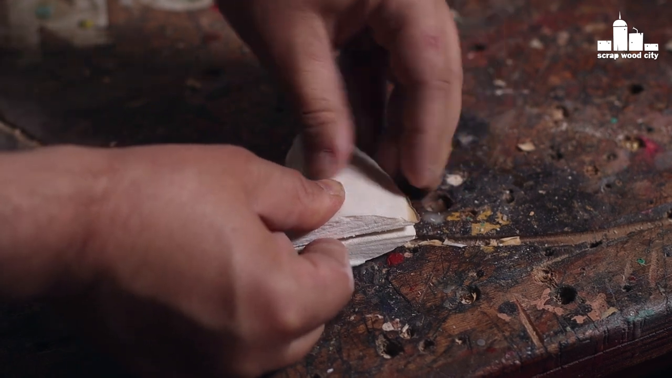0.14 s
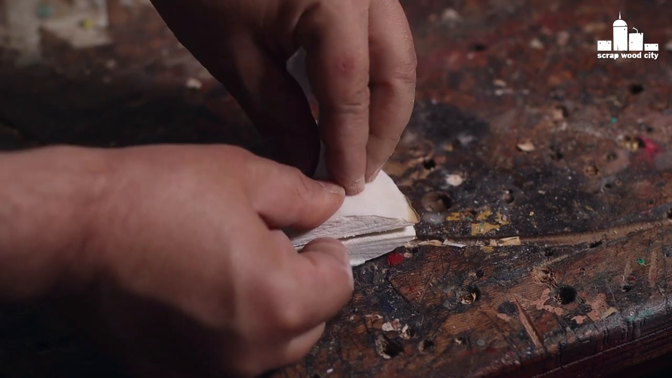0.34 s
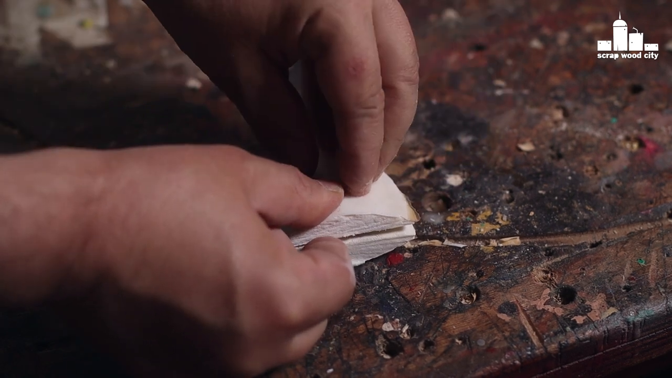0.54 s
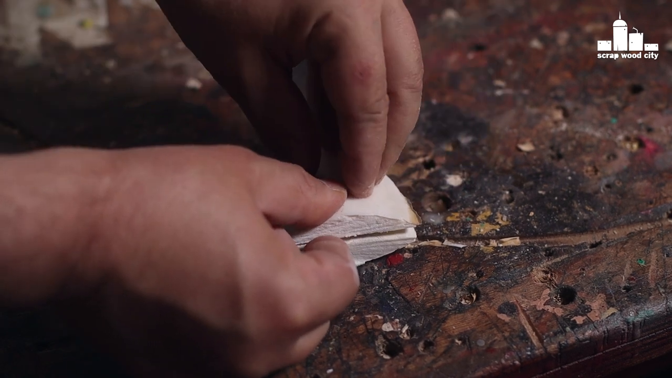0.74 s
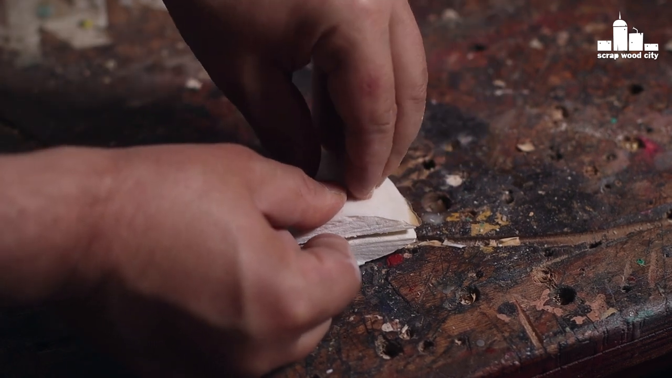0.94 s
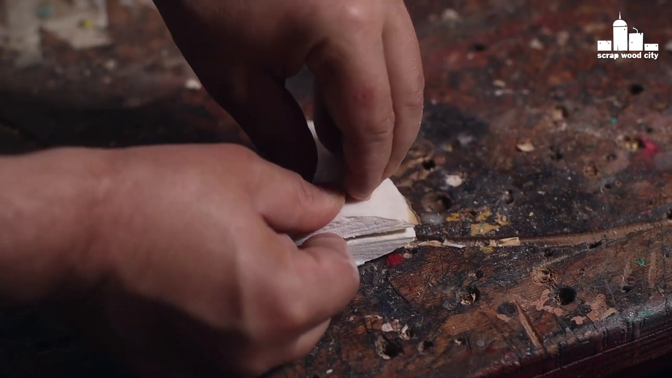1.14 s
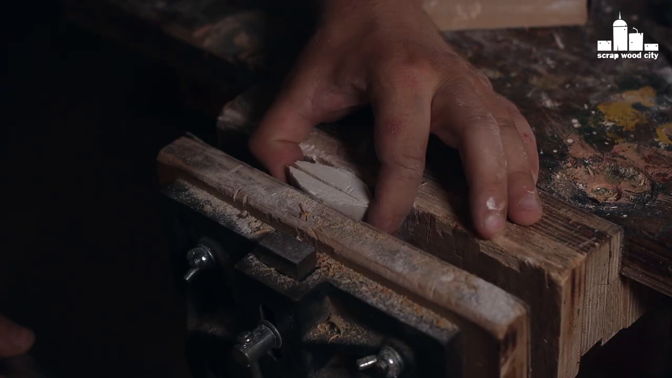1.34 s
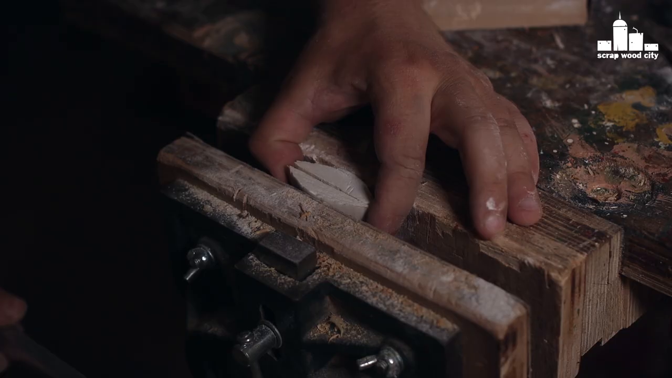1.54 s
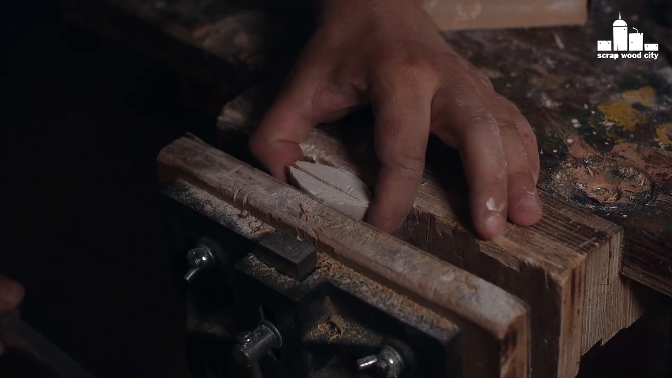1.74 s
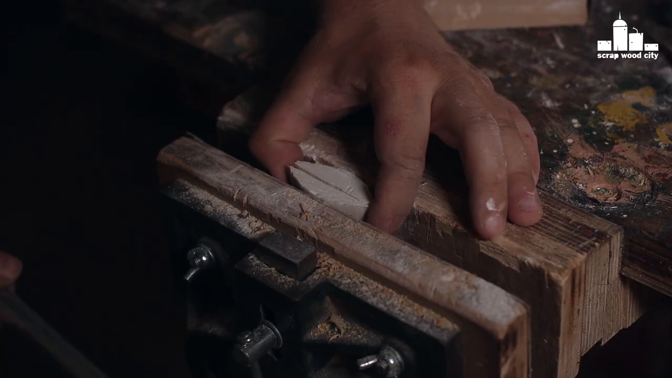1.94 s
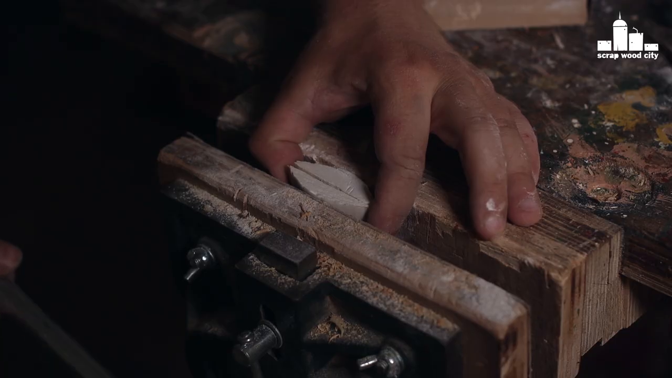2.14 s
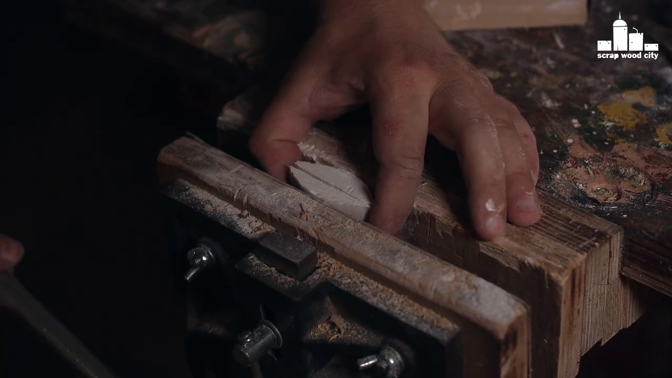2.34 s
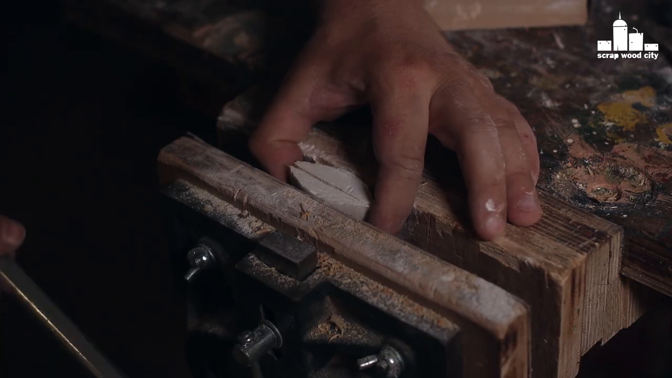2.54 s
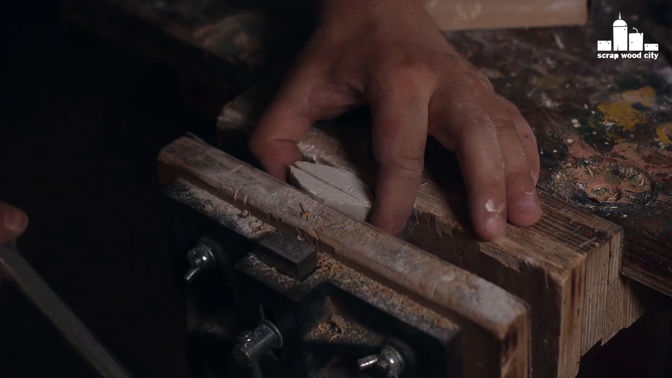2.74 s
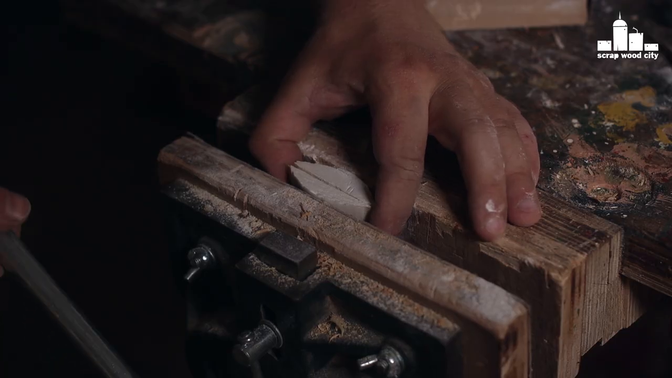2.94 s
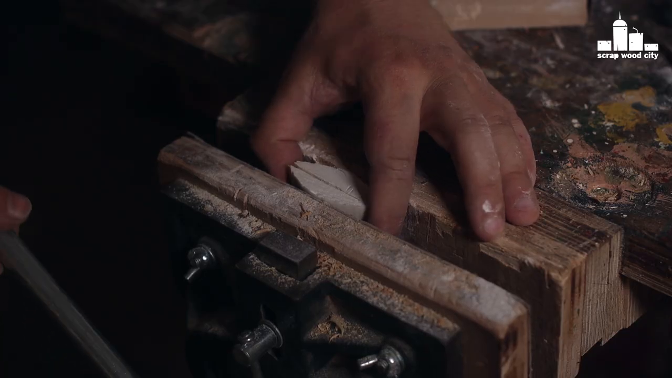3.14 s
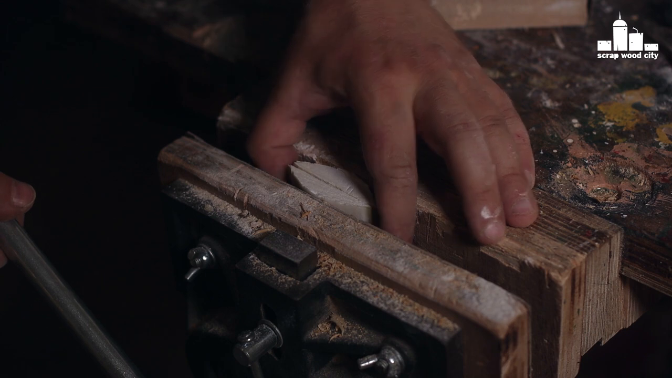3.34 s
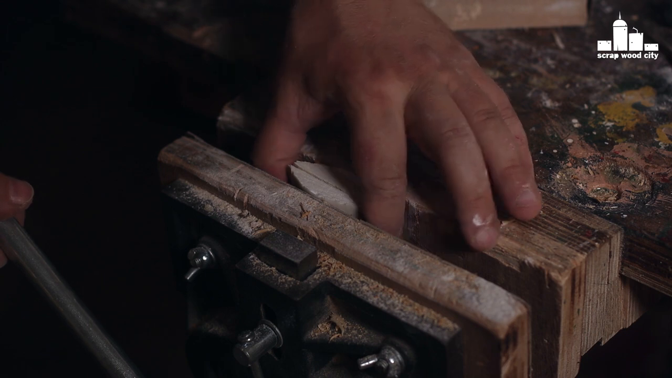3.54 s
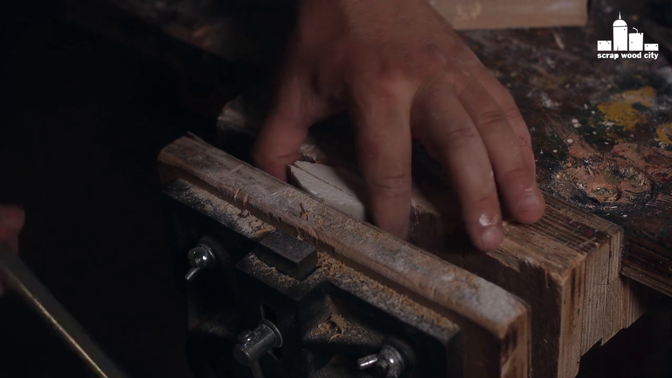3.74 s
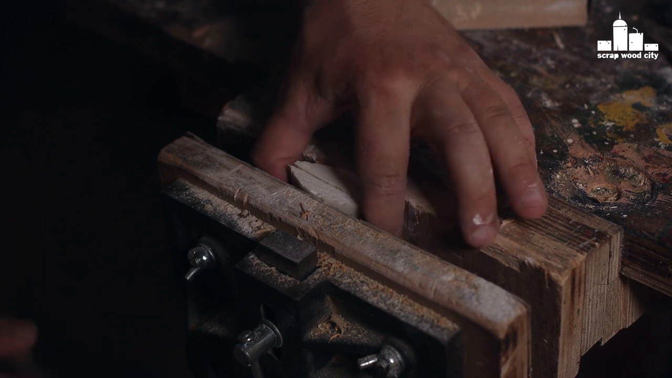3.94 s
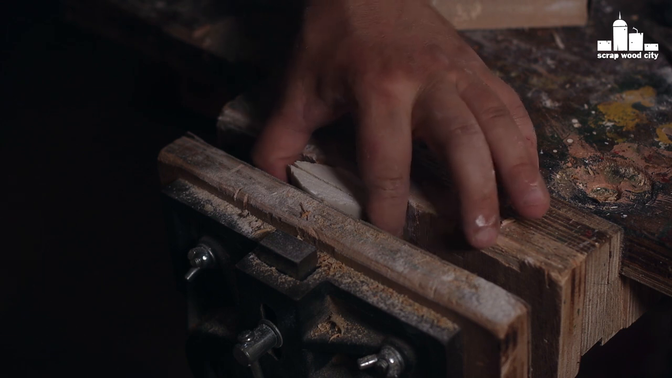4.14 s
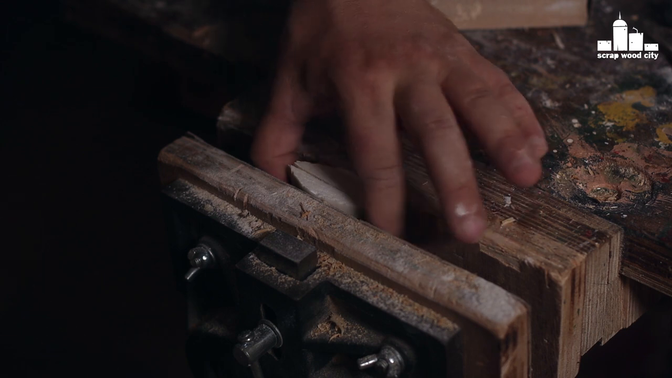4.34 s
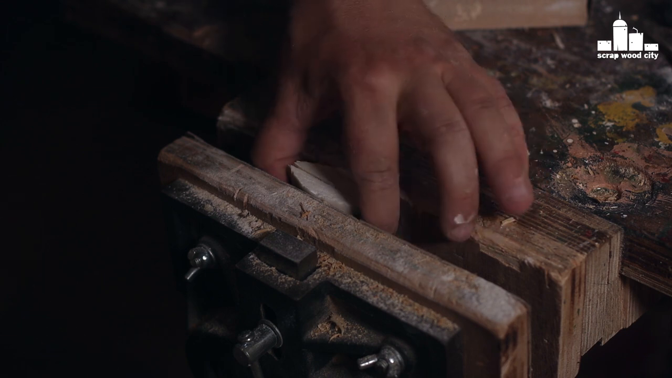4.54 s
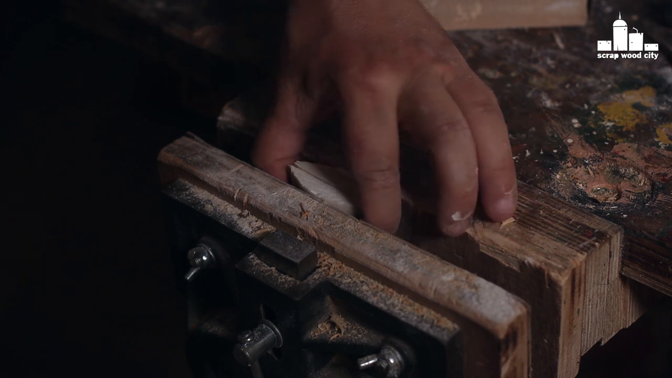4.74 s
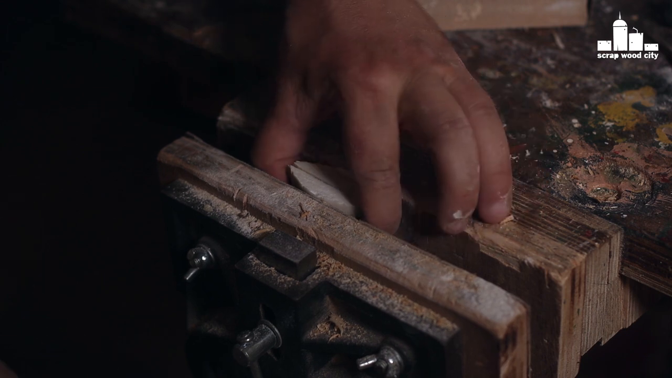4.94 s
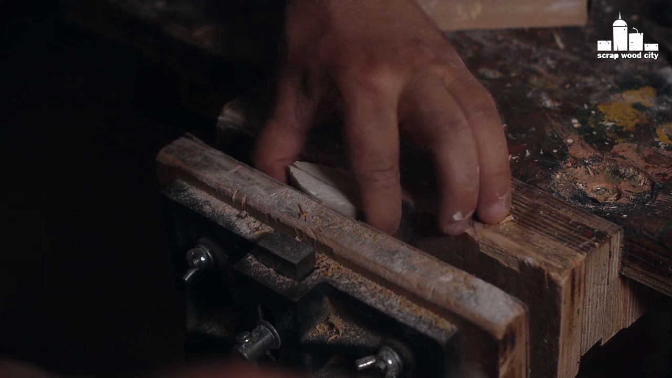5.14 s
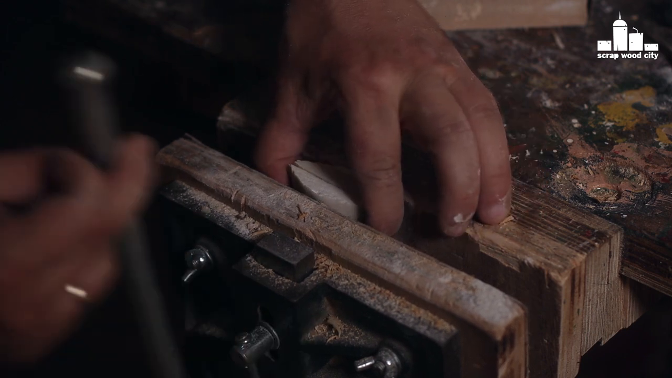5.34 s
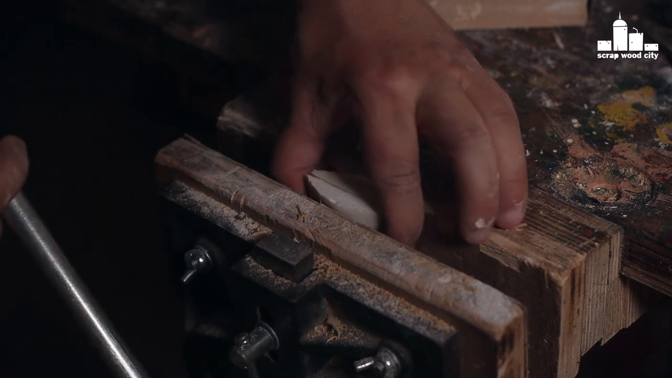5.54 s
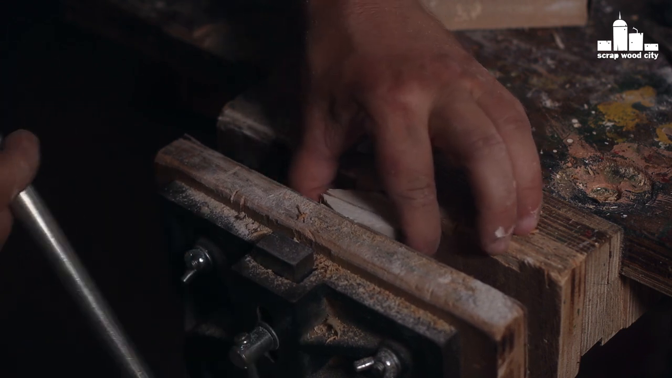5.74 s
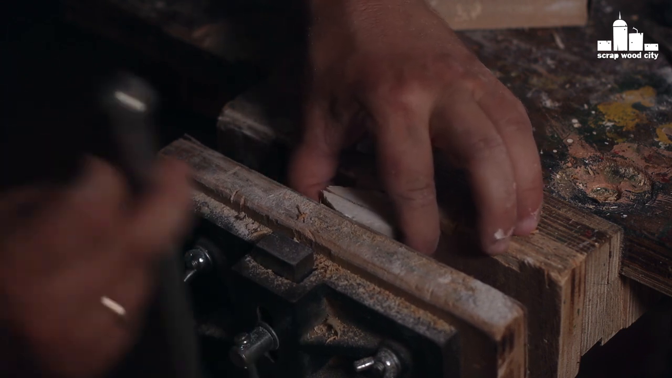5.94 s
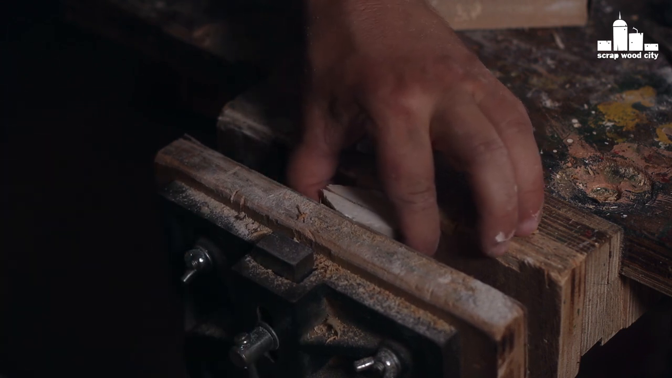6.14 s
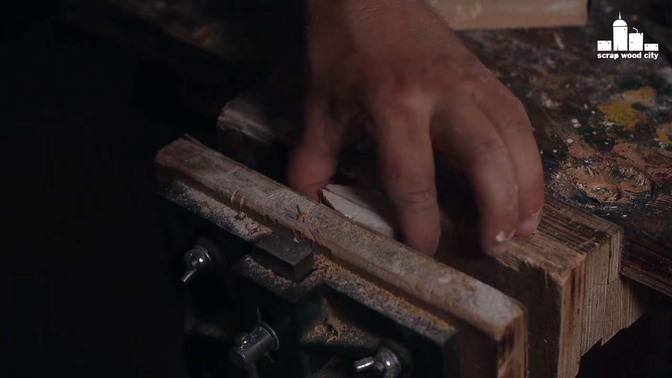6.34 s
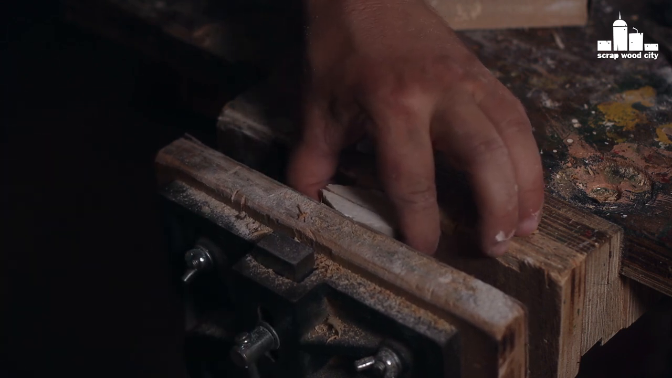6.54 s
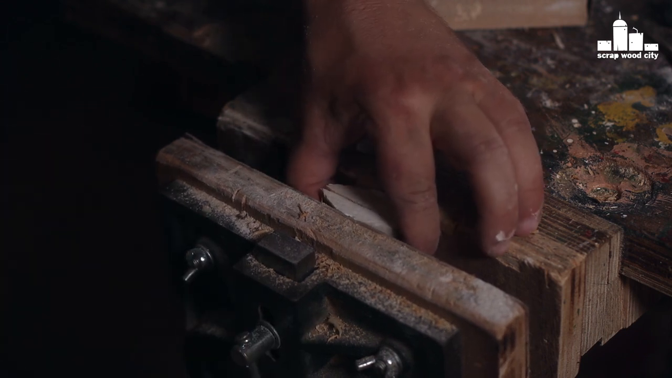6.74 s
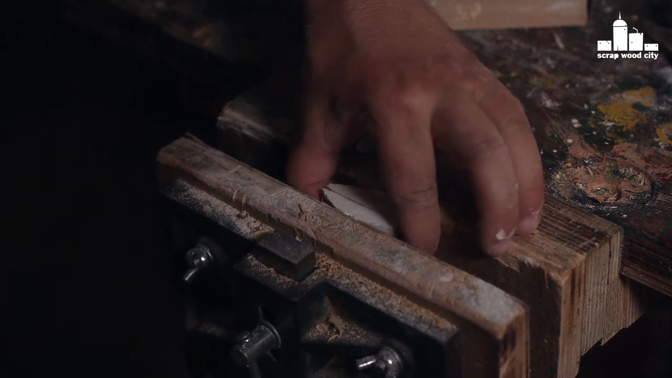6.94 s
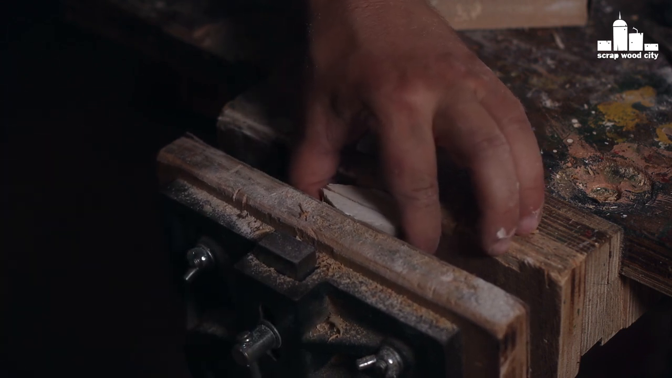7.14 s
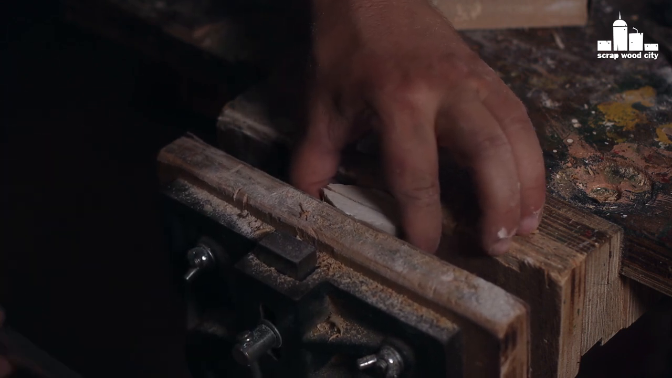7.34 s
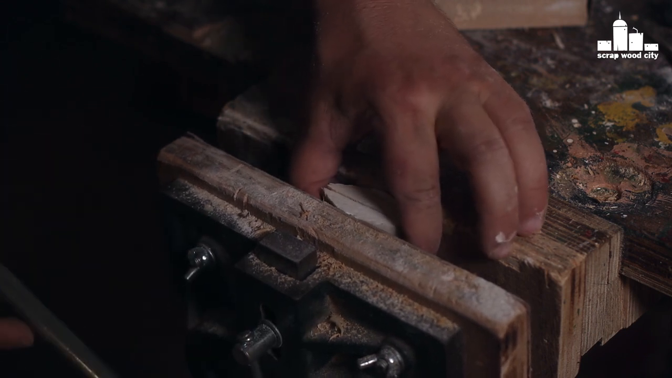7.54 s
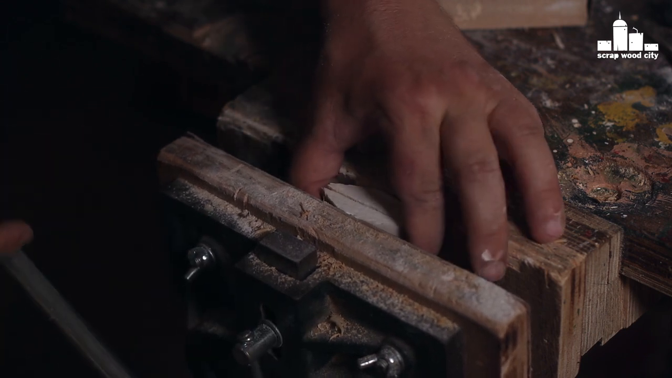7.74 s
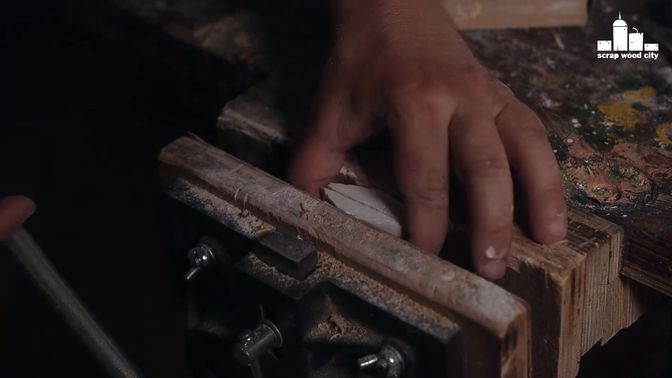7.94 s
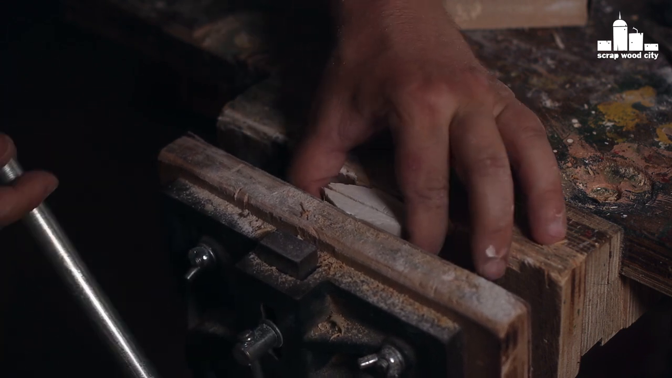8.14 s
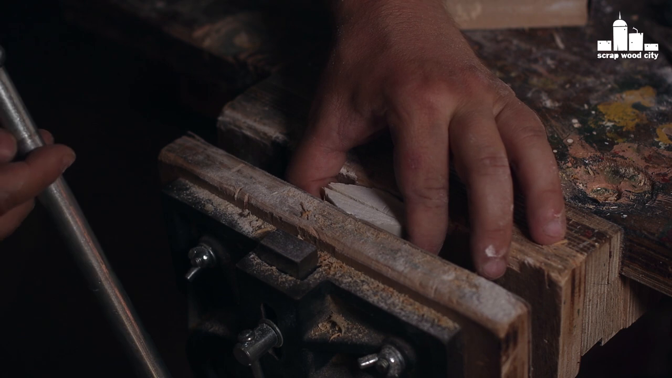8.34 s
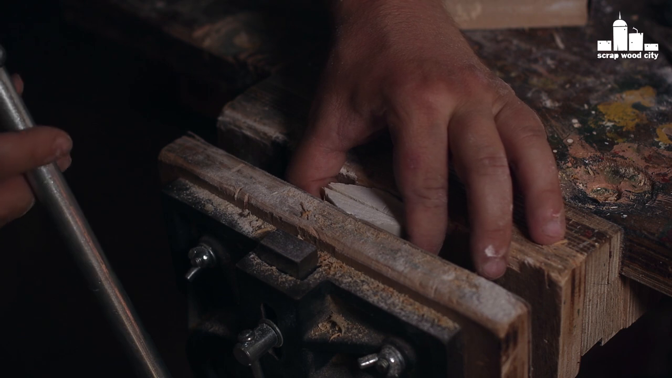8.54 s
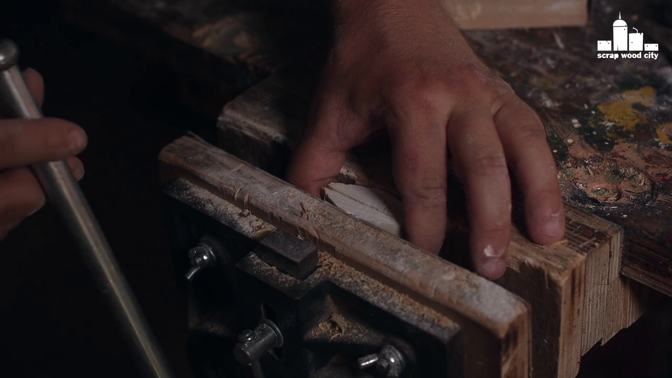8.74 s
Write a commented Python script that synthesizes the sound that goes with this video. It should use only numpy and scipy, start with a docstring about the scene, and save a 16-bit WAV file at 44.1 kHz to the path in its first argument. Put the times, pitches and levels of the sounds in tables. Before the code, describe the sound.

Close, dry skin rubbing and tiny snaps, then sparse metallic clacks and brief creaky scrapes as an iron vise is wound shut.

```python
"""A bench vise is wound shut on a small mould, close to a stereo microphone in a quiet workshop.
The screw grinds in short turns (scattered impulses through ringing iron and boards), and the loose handle bar
ticks, slides and clacks in its hub (short noise bursts through resonances). Before that, fingers press the
mould together: rubbing skin is noise made of tiny catches, snaps are bursts.
The room answers with echoes and a noise tail, over faint hiss, hum, rumble and drones made of noise and sines."""
import sys
import numpy as np
from scipy import signal
from scipy.fft import rfft, irfft, next_fast_len
from scipy.io import wavfile
from scipy.ndimage import map_coordinates

SR = 44100
rng = np.random.default_rng(int(sys.argv[2]) if len(sys.argv) > 2 else 0)


def attenuation_scalar(level_db):
    """Turn a level in dB into a linear amplitude multiplier (20 dB per decade)."""
    decades = np.asarray(level_db, float) / 20
    return 10 ** decades


def materialize(psi):
    """Save the field psi as 16-bit PCM at rate SR to the path in sys.argv[1].

    A 1-D psi becomes a single channel; in a 2-D psi each row is a channel.
    """
    bounded = np.clip(np.atleast_2d(psi).T, -1, 1)
    quanta = np.round(bounded * 32767).astype(np.int16)
    wavfile.write(sys.argv[1], SR, quanta)


N = 387198  # length in samples


def unit(x):
    """Scale x to an rms of 1."""
    return x / np.sqrt(np.mean(x ** 2) + 1e-20)


def noise():
    """White noise as long as the scene."""
    return rng.standard_normal(N)


def along(points, hz):
    """Read (f/Hz, value) points at any frequency, on a log axis."""
    f, value = np.transpose(points)
    return np.interp(np.log(hz + 1), np.log(f + 1), value)


def gain(rows):
    """One gain per sample from (t/s, level/dB) rows, practically silent outside them."""
    s, db = np.transpose(rows)
    return attenuation_scalar(np.interp(np.arange(N) / SR, s, db, left=-200, right=-200))


def swell(start, peak, end, db, rise_db, fall_db):
    """A gain that climbs rise_db to its peak, then sinks fall_db; silent outside."""
    return gain([(start, db - rise_db), (peak, db), (end, db - fall_db)])


def swells(rows, rise_db, fall_db):
    """All the swells of a table, added up."""
    return sum(swell(*row, rise_db, fall_db) for row in rows)


def wobble(rate):
    """A smooth random curve through `rate` random knots a second."""
    knots = rng.standard_normal(int(N * rate / SR) + 4)
    return map_coordinates(knots, [np.arange(N) * rate / SR])


def filtered(x, response):
    """Multiply the spectrum of x by a complex response of frequency."""
    n = x.shape[-1]
    m = next_fast_len(n + 8192)  # room for the ringing
    return irfft(rfft(x, m) * response(np.fft.rfftfreq(m, 1 / SR)), m)[..., :n]


def band(f, hz, width_hz):
    """One resonance that rings only after it is struck."""
    return 1j * f * width_hz / (hz * hz - f * f + 1j * f * width_hz + 1e-9)


def modes(f, table):
    """The resonances of a body, each excited at a slightly random strength, with alternating signs."""
    total = 0
    for k, (hz, width_hz, db) in enumerate(table):
        strength = attenuation_scalar(db + rng.normal(0, 2))
        total = total + (-1) ** k * strength * band(f, hz, width_hz)
    return total


def spread(pair, alike, spectrum=((1, 0),)):
    """Mix two unrelated noises into a left and right of the given likeness, and colour them."""
    def mid_side_gains(hz):
        angle = np.arccos(np.clip(along(alike, hz), -1, 1)) / 2
        return attenuation_scalar(along(spectrum, hz)) * [np.cos(angle), np.sin(angle)]
    mid, side = filtered(pair, mid_side_gains)
    return np.array([mid + side, mid - side])


def burst(t60, length=0.2, spray=1.0):
    """A first touch, then a spray of smaller ones that swells for a moment and dies; times in s."""
    t = np.arange(round(length * SR)) / SR
    x = rng.standard_normal(len(t)) * (1 - np.exp(-t / 0.0033)) * attenuation_scalar(-60 * t / t60)
    x *= spray / np.linalg.norm(x)
    x[0] += 1
    return x


def grit(rate, spread_db):
    """Irregular catches of a rough surface: about `rate` impulses a second, of scattered size, rms 1."""
    hits = rng.random(N) < rate / SR
    size = rng.standard_normal(N) * attenuation_scalar(spread_db * rng.exponential(size=N))
    return unit(hits * size)


def add(track, s, x):
    """Mix x into the track at time s."""
    part = track[round(s * SR):][:len(x)]
    part += x[:len(part)]


# colour of the room tone: f/Hz, level/dB (relative, per Hz)
AIR_COLOUR = [(15, -59), (25, -24), (58, -7), (90, -7), (154, -8), (214, -6), (399, -12.5), (433, -15.5),
              (496, -11.5), (538, -11.5), (669, -17), (1090, -17.5), (2150, -21.5), (14800, -27.5),
              (16500, -27)]
# how alike left and right are in the room tone: f/Hz, likeness (1 same, 0 unrelated, below 0 opposed)
AIR_LIKENESS = [(60, 0.89), (180, 0.85), (550, 0.53), (1650, -0.049), (4970, -0.17), (15000, -0.35)]
# steady low tones: f/Hz, level/dB (rms, before the wobble)
DRONES = [(86.1, -83.5), (102.3, -79.5)]
# swells of the low rumble: start t/s, peak t/s, end t/s, level/dB
RUMBLE_SWELLS = [(.9, 1.3, 1.56, -69.5), (3.7, 3.82, 4.0, -66), (4.85, 5.07, 5.3, -61),
                 (6.3, 6.5, 6.88, -65)]
# comings and goings of the faint hum: start t/s, peak t/s, end t/s, level/dB
HUM_SWELLS = [(0, 1.2, 5.4, -75.5), (8.1, 8.4, 9.1, -74.5)]


def air():
    """Room tone and hiss are coloured noise, rumble and hum narrow noise bands, drones wavering sines."""
    level = attenuation_scalar(-64.5 + 0.77 * wobble(2.35))
    tone = level * unit(spread(rng.standard_normal((2, N)), AIR_LIKENESS, AIR_COLOUR))
    rumble = unit(filtered(noise(), lambda f: band(f, 69.5, 25) ** 2))
    hum = unit(filtered(noise(), lambda f: band(f, 429, 32) ** 2))
    t = np.arange(N) / SR
    drone = 0
    for hz, db in DRONES:
        drone = drone + attenuation_scalar(db + 4.4 * wobble(1.9)) * np.sqrt(2) * np.sin(2 * np.pi * hz * t)
    low = swells(RUMBLE_SWELLS, rise_db=8, fall_db=15) * rumble
    return tone + drone + low + swells(HUM_SWELLS, rise_db=5.5, fall_db=13.5) * hum


# early echoes: delay t/s, level/dB, left over right level/dB
WALL_ECHOES = [(.0045, -3.5, -2), (0.0127, -11.5, 5.5)]
# how fast the late tail dies: f/Hz, time to fall 60 dB t/s
TAIL_DECAY = [(200, 0.61), (1000, 0.56), (4000, 0.5), (8000, 0.42), (14000, 0.27)]
# how alike left and right are in the tail: f/Hz, likeness (1 same, 0 unrelated)
TAIL_LIKENESS = [(200, 1), (1000, 0.97), (4000, 0.78), (12000, 0.067)]


def room(x, wet_db, step=.3):
    """Early echoes, then a noise tail whose frequencies die at their own speeds, new every `step` seconds."""
    out = np.array([x, x])
    for delay, db, pan_db in WALL_ECHOES:
        echo = np.pad(x, (round(delay * SR), 0))[:N]
        out += attenuation_scalar([[db + pan_db / 2], [db - pan_db / 2]]) * echo
    size = round(step * SR)
    for start in range(0, N, size):
        hz, t, z = signal.stft(rng.standard_normal((2, round(.7 * SR))), SR, nperseg=256)
        dying = z * attenuation_scalar(-60 * t / along(TAIL_DECAY, hz)[:, None])
        tail = spread(signal.istft(dying, SR, nperseg=256)[1], TAIL_LIKENESS)
        t_tail = np.arange(tail.shape[1]) / SR
        tail *= np.clip(t_tail / 0.0027, 0, 1)  # the tail builds up after the direct sound
        tail *= 1 + 1.84 * attenuation_scalar(-60 * t_tail / .12)  # near surfaces answer first and strongly
        tail /= np.linalg.norm(tail[0])
        wet = signal.fftconvolve(x[None, start:start + size], tail, axes=1)
        out[:, start:start + wet.shape[1]] += attenuation_scalar(wet_db) * wet[:, :N - start]
    return out


# pressure of the fingers: t/s, level/dB (of the rub, before its strokes)
FINGER_PRESSURE = [(0, -64), (.1, -58), (.28, -55.5), (.4, -63), (.8, -64.5), (1.05, -63.5), (1.2, -64.5),
                   (1.41, -64)]
# colour of skin on the mould: f/Hz, level/dB (relative, per Hz)
SKIN_COLOUR = [(410, -3.5), (700, -4), (1010, -3.5), (1830, -3), (2600, -2.5), (3830, -3), (5560, -11.5),
               (9000, -25.5), (11700, -18), (19800, -120)]
# two resonances of the scrape: f/Hz, width f/Hz, level/dB (over the rub, before it drifts)
SCRAPE = [(2470, 420, -14.5), (2970, 450, -14)]


def rubbing():
    """Skin catches on the mould right by the microphone, in uneven strokes, with a drifting scrape in it."""
    pair = np.array([grit(rate=5600, spread_db=-1.0), grit(rate=5000, spread_db=3.0)])
    strokes = attenuation_scalar(1.4 * wobble(19.9) + 0.42 * wobble(5.5))
    rub = unit(spread(pair, [(1000, 0.99), (6000, 0.62)], SKIN_COLOUR))
    scrape = 0
    for hz, width_hz, db in SCRAPE:
        ringing = unit(filtered(rub, lambda f: band(f, hz, width_hz) ** 2))
        scrape = scrape + attenuation_scalar(db + 6.1 * wobble(5.33)) * ringing
    return gain(FINGER_PRESSURE) * strokes * (rub + scrape)


# palm sliding along the bar: start t/s, peak t/s, end t/s, level/dB
PALM_SLIDES = [(5.5, 5.68, 5.87, -57)]
# colour of the sliding palm: f/Hz, level/dB (relative, per Hz)
PALM_COLOUR = [(1760, -2), (3000, -1), (6620, -5.5), (12100, 4), (15100, 1), (16000, 9.5)]
# palm dragging on the bar: start t/s, peak t/s, end t/s, level/dB
PALM_DRAGS = [(5.2, 5.55, 5.78, -71.5), (7.62, 7.7, 7.95, -72.5)]
# the handle bar humming under the palm: f/Hz, width f/Hz, level/dB (relative)
BAR_MODES = [(1050, 72, -13), (1570, 146, -17), (520, 100, -18)]
# snaps and taps of fingers on mould and bar, and one ringing ping of the vise (at 5.792 s):
# t/s, peak level/dB, f/Hz, width f/Hz, time to fall 60 dB t/s
SNAPS_AND_PING = [(.07, -30, 9700, 5960, 0.0035), (0.07, -36.5, 4000, 5000, .015),
                  (0.188, -34.5, 7300, 2000, 0.0058), (0.192, -28.5, 11100, 8200, 0.0064),
                  (0.191, -39, 2360, 5000, .03), (.27, -67, 4000, 8000, .05), (.274, -54, 520, 121, 0.037),
                  (0.581, -49.5, 9000, 9000, 0.053), (0.61, -42, 560, 1080, 0.031),
                  (.635, -47.5, 9000, 9000, .017), (.835, -49, 4270, 1300, 0.16),
                  (2.884, -52, 4500, 6100, .18), (3.149, -62, 2000, 2000, .02),
                  (3.443, -41, 2870, 9500, 0.078), (3.543, -45.5, 4520, 9350, 0.01),
                  (4.481, -59, 12000, 5050, 0.013), (5.792, -54.5, 5170, 500, 0.047),
                  (7.595, -41.5, 3600, 9000, 0.0051)]


def hands_and_ping():
    """Bursts for mould snaps, finger taps and one ping of the vise; noise for a palm that makes the bar hum."""
    slide = unit(filtered(noise(), lambda f: attenuation_scalar(along(PALM_COLOUR, f))))
    bar_hum = unit(filtered(noise(), lambda f: modes(f, BAR_MODES) + 0.093 * band(f, 840, 1300)))
    out = swells(PALM_SLIDES, rise_db=16, fall_db=19.5) * slide
    out += swells(PALM_DRAGS, rise_db=2.5, fall_db=9) * bar_hum
    for s, db, hz, width_hz, t60 in SNAPS_AND_PING:
        hit = filtered(burst(t60), lambda f: band(f, hz, width_hz) ** 2)
        add(out, s, attenuation_scalar(db) * hit / abs(hit).max())
    return out


# modes of the bench boards: f/Hz, width f/Hz, level/dB (relative)
BENCH_MODES = [(160, 23, -9), (234, 15, 3), (342, 15.2, -1.5), (384, 25, -6.5), (529.5, 50, -0.5),
               (680, 113, -12.5), (718, 27, -7.5)]


def bench(f):
    """The bench boards ring at a handful of low resonances."""
    return modes(f, BENCH_MODES)


# rings of the iron casting: f/Hz, width f/Hz, level/dB (relative)
IRON_RINGS = [(980, 30, -1), (1060, 58, 5), (1520, 310, 3), (2140, 52, -7), (2290, 76, 2.5),
              (2560, 200, -3.5), (3663, 46, 10.5), (3780, 120, -15), (4380, 440, -10), (5430, 320, 2.5),
              (7960, 88, 2.5), (10700, 90, 6), (12500, 29, 19)]


def iron(f, ring_db=-8):
    """The casting adds its rings, at slightly random strengths, on top of a broad contact sound."""
    rings = 0
    for hz, width_hz, db in IRON_RINGS:
        rings = rings + attenuation_scalar(ring_db + db + 2 * rng.standard_normal()) * band(f, hz, width_hz)
    return 1 + rings


# contacts in the vise: t/s, tone peak level/dB, tone f/Hz, then against the tone's peak:
# bench thud level/dB, bright edge level/dB
CONTACTS = [(1.532, -41, 1740, -28, 3.5), (2.488, -36, 1740, -23, 4), (3.694, -60.5, 696, 7, -28),
            (3.721, -43.5, 1670, -3.5, -46), (3.755, -28.5, 1970, -9.5, -1.5),
            (3.766, -34.5, 646, -12.5, -40), (3.806, -34.5, 1780, -14, -37), (3.835, -47.5, 690, 6, -31),
            (3.868, -43.5, 1460, -3, -27), (4.038, -13.5, 2280, -26, -7.5), (4.044, -25.5, 787, -15.5, 2.5),
            (4.254, -52, 960, -6, 0), (4.79, -47.5, 1030, 0.5, -6), (4.82, -33.5, 1030, -5, -9),
            (4.876, -29, 1530, -6, -5), (4.895, -35, 1500, -21, -6), (4.915, -27, 1110, -11.5, -1.5),
            (4.946, -25, 1320, -4.5, -4), (4.983, -22.5, 2800, -15.5, -31), (5.011, -26.5, 790, -14, -2.5),
            (5.049, -25.5, 1390, -12.5, -6.5), (5.114, -48, 777, -5, -29), (5.735, -47, 1550, 0, -21),
            (5.79, -39, 1860, -7, -9), (5.826, -30.5, 1330, -5.5, -19), (5.902, -15.5, 3090, -20, -15),
            (5.91, -23.5, 2350, -30, -10), (5.926, -29, 930, -18, -2), (6.313, -26.5, 1570, -10.5, -14),
            (6.328, -34.5, 680, -3.5, -43), (6.465, -36.5, 1550, 1, 8.5), (6.473, -37, 1020, -22, -5),
            (6.52, -49.5, 1050, 8.5, -17), (8.03, -54.5, 1390, -20, 1.5)]


def clacks():
    """Each contact has a tone of its own, a thud in the bench, a wooden knock and a bright edge."""
    out = np.zeros(N)
    for s, db, hz, thud_db, edge_db in CONTACTS:
        hard = min(attenuation_scalar(edge_db), 1)  # a hard contact is brief, so its tone spreads wider
        width_hz = (0.59 + 1.66 * hard) * hz
        tone = filtered(burst(0.03, spray=0.72), lambda f: band(f, hz, width_hz) ** 3 * iron(f))
        thud = filtered(burst(0.055), lambda f: bench(f) * band(f, 165, 720) ** 2)
        knock = filtered(burst(0.018), lambda f: band(f, 860, 1280) ** 3 * (iron(f) + 1.06 * bench(f)))
        edge = filtered(burst(0.0045, spray=0.4),
                        lambda f: (band(f, 4050, 1947) ** 2 + 0.28 * band(f, 5700, 5000) ** 2) * iron(f))
        knock_db = thud_db / 2 + 0.5  # the jaws knock harder when more of the blow goes into the wood
        for part, part_db in ((tone, 0), (thud, thud_db), (knock, knock_db), (edge, edge_db)):
            add(out, s, attenuation_scalar(db + part_db) * part / abs(part).max())
    dull_hz = 8100  # heavy parts put little sound above this
    return filtered(out, lambda f: 1 / (1 + 1.3j * f / dull_hz - (f / dull_hz) ** 2))


# pulls on the handle that load the screw: start t/s, peak t/s, end t/s,
# load level/dB (before the uneven drag), rasp against the load level/dB
TURNS = [(3.716, 3.79, 4.44, -67.5, -10), (4.786, 4.809, 4.94, -50, -20), (4.878, 4.934, 4.99, -45, 3),
         (4.97, 5.01, 5.136, -48.5, 1.5), (5.76, 5.869, 6.01, -49, -30), (6.165, 6.274, 6.31, -66, -11),
         (6.315, 6.391, 6.46, -56, -25), (6.48, 6.54, 6.77, -64, -9.5)]
# colour of the rasp: f/Hz, level/dB (relative)
RASP_COLOUR = [(1290, -53), (2200, -2.5), (3620, -5), (6990, -17), (10000, -17), (12300, -36), (15000, -45)]


def screw():
    """The loaded thread catches and slips: coarse slips shake the bench and groan, fine grit rasps in the iron."""
    out = np.zeros(N)
    ends_db, rasp_grows, groan_db = 11, 2.6, 1  # load's drop at both ends; rasp drops more; groan over rumble
    for start, peak, end, db, rasp_db in TURNS:
        load = swell(start, peak, end, db, ends_db, ends_db)
        rasp = swell(start, peak, end, db + rasp_db, rasp_grows * ends_db, rasp_grows * ends_db)
        slips = grit(rate=500, spread_db=2)
        fine = grit(rate=2500, spread_db=2)
        rumble = unit(filtered(slips, lambda f: bench(f) * band(f, 307, 385) ** 2))
        groan = unit(filtered(slips, lambda f: band(f, 780, 670) ** 2 * (iron(f, ring_db=-7) + 4.0 * bench(f))))
        hiss = unit(filtered(fine, lambda f: attenuation_scalar(along(RASP_COLOUR, f)) * iron(f, ring_db=15.0)))
        drag = attenuation_scalar(2.5 * wobble(35))  # the drag is uneven along the thread
        out += drag * (load * (rumble + attenuation_scalar(groan_db) * groan) + rasp * hiss)
    return out


def scene():
    """Vise and hands in the room, a touch stronger on the right, with the close rubbing and the room tone."""
    in_room = room(clacks() + screw() + hands_and_ping(), wet_db=4.5)
    return attenuation_scalar([[-.2], [.2]]) * in_room + rubbing() + air()


def low_pass(x):
    """Removes everything above the highest recorded frequency."""
    return signal.sosfilt(signal.butter(12, 16670, fs=SR, output="sos"), x)


def record(dry):
    """The mix keeps only what lies below 15780 Hz."""
    mix = filtered(dry, lambda hz: hz < 15780)
    return low_pass(mix)


dry = scene()
out = record(dry)
materialize(out)
```